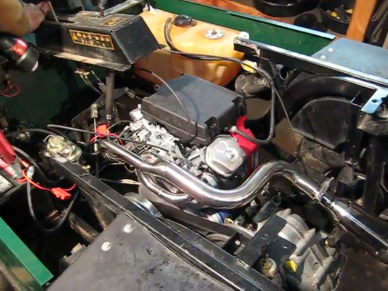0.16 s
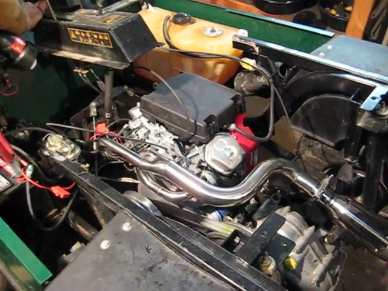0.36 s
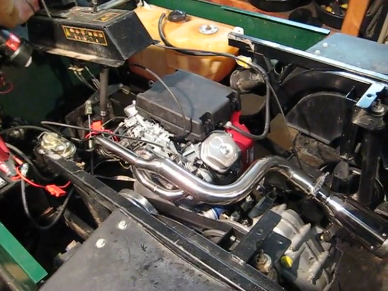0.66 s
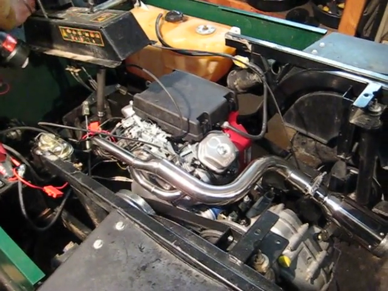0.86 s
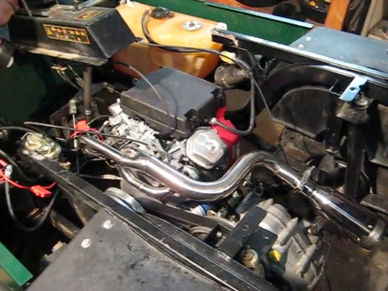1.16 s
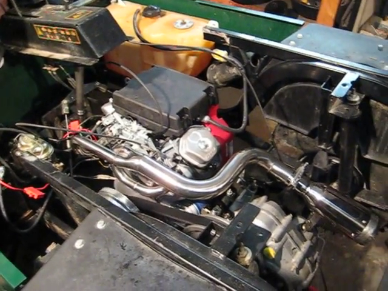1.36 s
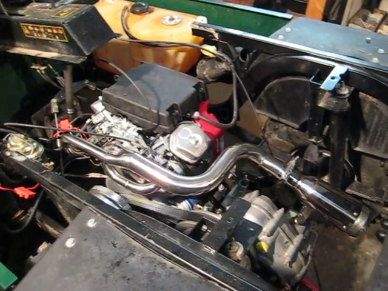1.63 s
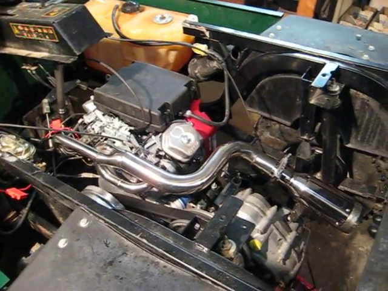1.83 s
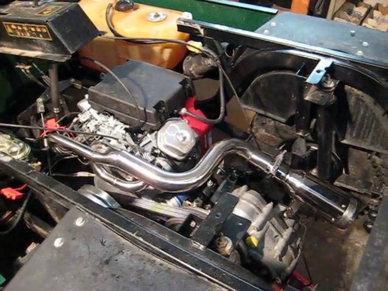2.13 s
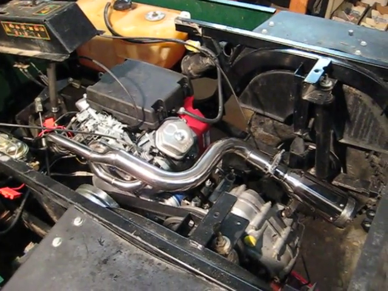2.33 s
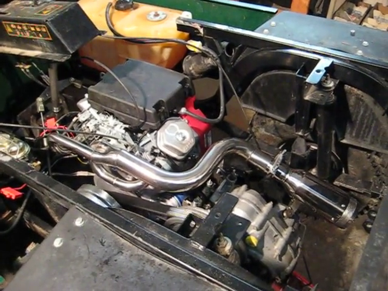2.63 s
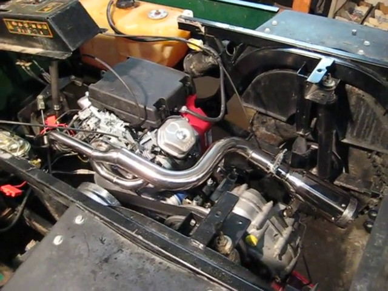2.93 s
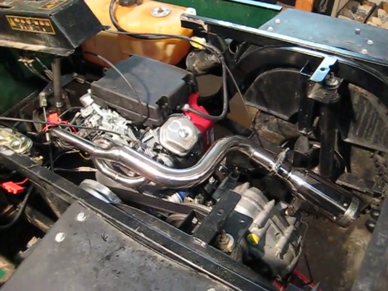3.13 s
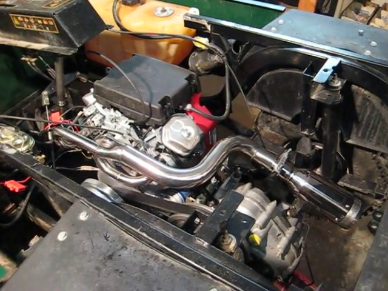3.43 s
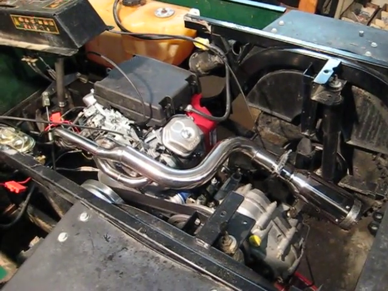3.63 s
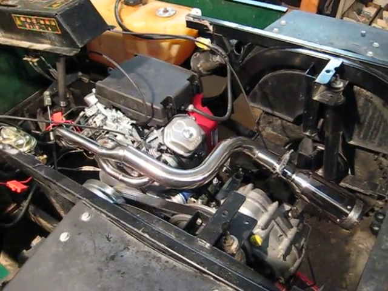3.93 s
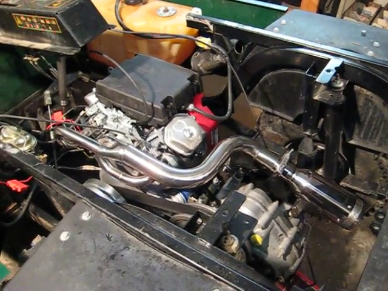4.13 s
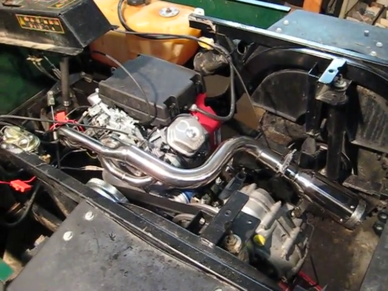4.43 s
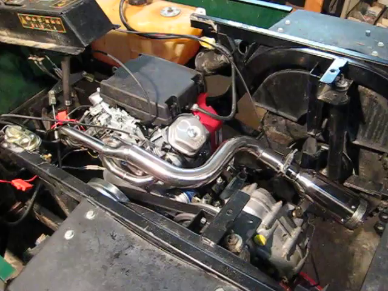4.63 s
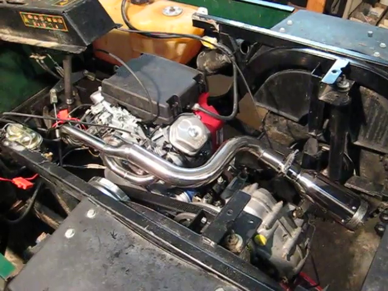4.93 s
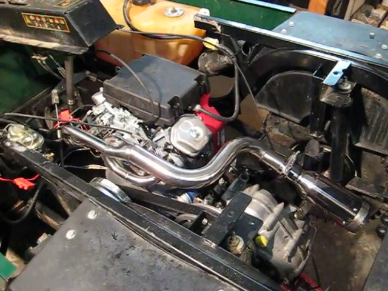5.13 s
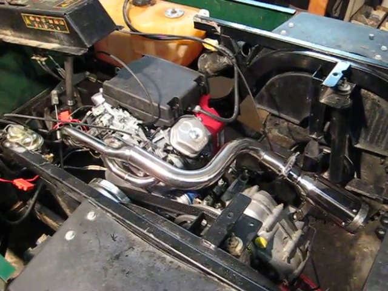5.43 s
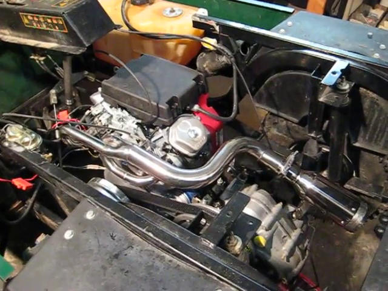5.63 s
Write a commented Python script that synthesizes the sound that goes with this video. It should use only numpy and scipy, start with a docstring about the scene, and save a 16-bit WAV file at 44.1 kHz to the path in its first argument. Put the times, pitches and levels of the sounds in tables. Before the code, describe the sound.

Close to an open engine bay outdoors, a hard metallic clack starts an electric starter. Its gears groan upward in fits within half a second, then grind and whine steadily with a fast compression throb, bright squeals and low exhaust puffs. At about four seconds drive stops; the engine shakes, knocks and rattles to rest. A faint squeak and a small click follow over quiet outdoor noise.

```python
"""A solenoid clacks, then a starter cranks a small V-twin petrol engine in an open engine bay, outdoors.
Pinion teeth strike the ring gear and ring the case; their pitch sags at each compression.
Gas pulses puff through the exhaust and excite its pipe resonance. The engine does not catch: filtered
noise bursts make it knock, rattle and settle to rest. A faint squeak of narrow-band noise and a second
clack follow, over a background of shaped outdoor noise and the sine hum of a distant machine."""
import sys
import numpy as np
from scipy import signal
from scipy.fft import rfft, irfft
from scipy.io import wavfile

SR = 44100
rng = np.random.default_rng(int(sys.argv[2]) if len(sys.argv) > 2 else 0)


def bounce(signal):
    """Save signal as a 16-bit WAV file at the path given by the first command-line argument."""
    frames = np.transpose(np.atleast_2d(signal))
    limited = np.clip(frames, -1, 1)
    pcm = np.round(limited * 32767).astype(np.int16)
    wavfile.write(sys.argv[1], SR, pcm)


N = 254365
TIME = np.arange(N) / SR  # s


# the starter runs from the beginning, its pinion bites fully, and later it is switched off
BITE_S, OFF_S = .097, 3.95
RUNUP_S = .15  # time constant of the fading run-up effort
COAST_S, COAST_POWER = .6, 1.5  # time to rest; friction brakes harder towards the end
COAST_DROP_DB = -10  # the teeth run unloaded once the starter is off
# mean crank speed: it picks up in fits, then holds: (time [s], speed [rpm])
CRANK_SPEED = [(0, 0), (.06, 160), (.095, 185), (.105, 339), (.133, 385), (.159, 388), (.177, 467),
               (.207, 502), (.279, 533), (.351, 588), (.373, 565), (.42, 604), (.457, 590), (.52, 624),
               (1, 646), (2.9, 637), (3.95, 640)]


def motion(bite_s=0.011, slip_db=-6):
    """Drive and friction set the crank speed (rpm), run-up effort (0-1) and gain of the tooth force."""
    bite = np.clip((TIME - BITE_S) / bite_s, 0, 1)
    coast = 1 - np.clip((TIME - OFF_S) / COAST_S, 0, 1) ** COAST_POWER
    rpm = np.interp(TIME, *np.transpose(CRANK_SPEED)) * coast
    effort = np.exp(-TIME / RUNUP_S) * bite
    powered = envelope(start_s=.05, attack_s=.015, hold_s=OFF_S - .065, fall_db_per_s=600)
    coasting = from_db(COAST_DROP_DB) * coast * (TIME > OFF_S)
    drive = from_db(slip_db * (1 - bite)) * np.maximum(powered, coasting)
    return rpm, effort, drive


RING_TEETH = 93.5  # tooth contacts per crank turn
TOOTH_SLOP = .025  # uneven tooth timing, share of a tooth
STEADY_S = .5  # when the rhythm is established
SETTLE_S = 0.55  # time constant of the early singing of the gears
GRIND_DB, SING_DB = -14.5, -20.5  # before effort, drive and case
CASE_SMEAR_T60_S = .06
# gear mesh tone: (multiple of the tooth rate, relative level [dB])
MESH_PARTIALS = [(1, -7), (2, -4), (3, -1.5), (4, 0), (5, 1.5), (6, 2), (7, 2.5), (8, 0), (9, -1), (10, 1),
                 (11, -1)]
# broad colour of starter and crankcase: (frequency [Hz], relative level [dB])
CASE_COLOUR = [(40, -18), (120, -14), (220, -14), (330, -8.5), (470, -30), (700, -8), (1050, -2),
               (1450, -1.5), (2400, -6.5), (3000, 0), (4500, -1), (7000, -10.5), (10500, -9.5),
               (15500, -31.5)]
# resonances of starter and crankcase: (frequency [Hz], width [Hz], lift [dB])
CASE_RESONANCES = [(1071, 16, 12.5), (1151, 31, 9.5), (1297, 83, 7), (1360, 45, -9), (1497, 93, 5),
                   (1700, 130, 5), (1872, 69, -7), (2012, 20, 6.5), (2646, 87, 6.5), (2830, 123, 9),
                   (3237, 150, 7), (3660, 60, 5), (3973, 140, 6.5), (4085, 38, 5), (4310, 84, 10),
                   (4710, 28, 13), (4762, 93, 6.5), (4830, 130, 2), (5516, 180, 10), (5890, 160, 13.5),
                   (6800, 140, 2), (7030, 330, 11.5), (7395, 65, 10), (8310, 200, 13), (8670, 170, 10.5),
                   (9430, 97, 6), (9560, 310, -3), (10520, 340, 2.5), (13340, 1700, 8.5)]


def starter(rpm, cycles, effort, drive, wander=.003, uneven_db=2.5, flicker_db=1.05, waver_db=3.5,
            scuff_db=-3, effort_db=2, early_sing_db=2, ring_db=-13):
    """Gear-mesh excitation: regular tooth impacts sing, uneven ones grind, and both ring the case."""
    swing, strain_db, load_db = compressions(cycles)
    early = np.exp(-TIME / SETTLE_S)
    steady = np.clip((TIME - STEADY_S) / .05, 0, 1)
    mesh_hz = rpm / 60 * RING_TEETH * (1 + swing * steady) * (1 + wander * drift(40))
    teeth = np.cumsum(mesh_hz) / SR + TOOTH_SLOP * drift(60)

    tone = np.zeros(N)
    for multiple, db in MESH_PARTIALS:
        phase = 2 * np.pi * (round(multiple) * teeth + rng.random())
        tone += from_db(db + waver_db * drift(47)) * np.sin(phase)
    tone = rms_one(smear(tone, CASE_SMEAR_T60_S)) * (TIME > BITE_S)
    singing = from_db(SING_DB + early_sing_db * early) * tone

    scuff = from_db(scuff_db) * rng.standard_normal(N)
    grind = rms_one(tooth_hits(teeth, uneven_db) + scuff)
    grinding = from_db(GRIND_DB + effort_db * effort + flicker_db * drift(27)) * grind
    force = drive * (grinding + singing + rockers(cycles))

    # slow teeth land softly and excite less treble
    soft = signal.sosfilt(signal.butter(1, 1500, fs=SR, output="sos"), force)
    hard = np.clip(rpm / 620, 0, 1) ** 2.0
    blows = hard * force + 2.0 * (1 - hard) * soft
    case = body(from_db(load_db) * blows, CASE_COLOUR, CASE_RESONANCES)

    tones = growl(teeth, strain_db * hard * steady) + whistle(teeth, mesh_hz, effort)
    tones = tones + hard * (squeal(cycles) + chirps(cycles))
    return reverberate(case, wet_db=ring_db, t60=0.21) + drive * tones


# two compressions of a four-stroke cycle: (position [share of cycle], width [share of cycle],
# loss of tooth rate [share], growl lift [dB], tooth load dip, negative for a rise [dB])
COMPRESSION_STROKES = [(1, .065, .08, 20.5, 0), (.41, .1, .07, 13, -0.5)]
# the tooth rate races between the compressions:
# (position [share of cycle], width [share of cycle], gain of tooth rate [share])
SPEED_SURGE = (.78, .085, .05)
# the gears run slightly out of true: (ripples [per cycle], depth [dB])
LOAD_RIPPLE = [(8, 0.4), (14, 0.66)]


def compressions(cycles):
    """Cyclic gas load modulates the tooth rate (share), growl (dB) and tooth load (dB)."""
    at, span, gain = SPEED_SURGE
    swing, strain_db, load_db = gain * once_a_cycle(cycles, at, span), 0, 0
    for share, width, loss, lift_db, dip_db in COMPRESSION_STROKES:
        squeeze = once_a_cycle(cycles, share, width)
        swing = swing - loss * squeeze
        strain_db = strain_db + lift_db * squeeze
        load_db = load_db - dip_db * squeeze
    for count, db in LOAD_RIPPLE:
        load_db = load_db + db * np.sin(2 * np.pi * round(count) * cycles)
    return swing - swing.mean(), strain_db, load_db


def tooth_hits(teeth, uneven_db):
    """Periodic impacts: each tooth's wear sets its timing, force and sign, repeating every cycle."""
    count = round(2 * RING_TEETH)
    wear = np.clip(rng.standard_normal((count, 3)), -2, 2)
    late, hard, side = wear[np.round(teeth).astype(int) % count].T
    return rms_one(passes(teeth + .15 * late) * from_db(uneven_db * hard) * np.sign(side))


# rockers take up their play: (position [share of cycle], level [dB])
ROCKER_CLICKS = [(0.255, -11), (0.551, -14), (.8, -10)]


def rockers(cycles, t60=0.13, clicks_per_s=2200, low_hz=6000):
    """Impact noise: each rocker sets off a short chatter of bright random clicks."""
    starts = sum(passes(cycles - share) * from_db(db) for share, db in ROCKER_CLICKS)
    clicks = rms_one((rng.random(N) < clicks_per_s / SR) * rng.choice([-1., 1.], N))
    bright = signal.sosfilt(signal.butter(2, low_hz, "high", fs=SR, output="sos"), clicks)
    return fade(starts, t60) * bright


GROWL_DB = -37  # before the strain lift
GROWL_SLOP = .03  # the teeth chatter under strain, share of a tooth
# the pinion groans in fits as it spins up:
# (start [s], length [s], level of mesh multiple 1 [dB], of 2 [dB], of 3 [dB])
PINION_GROANS = [(0.046, 0.047, -17.5, -22, -40), (0.104, 0.074, -19, -20, -19),
                 (0.172, 0.035, -22, -29, -23), (0.205, 0.05, -48, -19, -28), (0.296, 0.12, -28, -35, -37),
                 (0.352, 0.039, -20, -36, -26), (0.428, 0.033, -30, -28, -21)]


def growl(teeth, strain_db, second_db=-13):
    """Load modulation raises low mesh harmonics at each compression and in fits during the run-up."""
    chatter = teeth + GROWL_SLOP * drift(220)
    partials = []
    for k in range(1, 4):
        flutter = from_db(1.2 * drift(3) + drift(150))
        partials.append(np.sin(2 * np.pi * k * chatter) * flutter)
    out = from_db(GROWL_DB + strain_db) * (partials[0] + from_db(second_db) * partials[1])
    for s, length, *levels in PINION_GROANS:
        groan = sum(from_db(db) * p for db, p in zip(levels, partials))
        out = out + np.sqrt(np.abs(swell(s, length))) * groan
    return out


def whistle(teeth, mesh_hz, effort, level_db=-7, centre_hz=2740, width_hz=180):
    """Resonance crossing: in the run-up the third mesh multiple glides through a case mode."""
    level = from_db(level_db + 1.5 * drift(60)) * np.sqrt(effort)
    return level * near(3 * mesh_hz, centre_hz, width_hz) * np.sin(6 * np.pi * teeth)


SQUEAL_HZ, SQUEAL_REST_DB = 4073, -18.5
# bouts of squealing from the ring gear: (start [s], length [s], level [dB])
SQUEAL_BOUTS = [(0.844, 0.63, -8), (1.3, 0.38, -10.5), (1.658, 0.059, -15), (1.78, 0.17, -11),
                (2.325, 0.16, -14), (3.01, 0.064, -12), (3.2, 0.08, -13.5), (3.5, 0.13, -12),
                (3.754, 0.11, -12.5)]
# the squeal throbs three times a cycle: (position [share of cycle], width [share of cycle], level [dB])
SQUEAL_THROBS = [(.23, 0.12, 2), (.6, 0.105, 0), (.885, 0.11, 1.5)]


def squeal(cycles, phase_wander=0.5, waver_db=2.0):
    """Amplitude modulation: a ring-gear mode throbs at set points of the engine cycle."""
    level = from_db(SQUEAL_REST_DB)
    for s, length, db in SQUEAL_BOUTS:
        level = np.maximum(level, from_db(db) * np.sqrt(np.abs(swell(s, length))))
    excited = sum(from_db(db) * once_a_cycle(cycles, share, width, order=4)
                  for share, width, db in SQUEAL_THROBS)
    tone = np.sin(2 * np.pi * SQUEAL_HZ * TIME + phase_wander * drift(34))
    return level * excited * from_db(waver_db * drift(73)) * tone


# the starter housing sings briefly:
# (position [share of cycle], width [share of cycle], frequency [Hz], level [dB])
HOUSING_CHIRPS = [(1, 0.028, 2810, -22.5), (0.347, .04, 2890, -23), (0.14, .035, 5000, -24),
                  (0.434, 0.066, 4325, -18), (0.83, .06, 4900, -21.5), (0.0092, 0.028, 4200, -20),
                  (0.1, .03, 5500, -24), (0.385, .03, 4000, -22), (0.483, 0.032, 4745, -20),
                  (.08, 0.054, 5470, -33), (.22, 0.055, 6500, -29), (0.74, 0.057, 5890, -23),
                  (0.315, 0.045, 7080, -27), (0.86, 0.035, 6300, -20.5), (0.24, .05, 11000, -37),
                  (0.53, .05, 8660, -29), (0.83, 0.056, 9400, -29)]


def chirps(cycles, phase_wander=0.86, waver_db=5.0):
    """Modal excitation: modes of the housing sound at set points of the cycle, at wavering levels."""
    out = np.zeros(N)
    for share, width, hz, db in HOUSING_CHIRPS:
        level = from_db(db + waver_db * drift(40)) * once_a_cycle(cycles, share, width)
        out += level * np.sin(2 * np.pi * hz * TIME + phase_wander * drift(50))
    return out * (1 - np.exp(-TIME / SETTLE_S))


PIPE_HZ, PIPE_T60_S = 69.2, 0.25  # lowest resonance of the pipe
# gas pulses at the valves: (position [share of cycle], boom level [dB], rasp level [dB])
GAS_PULSES = [(.09, -26, -10), (.2, -8, -10), (.277, -6, -3.5), (.573, -.5, -12), (.727, -7.5, -17),
              (.8, -26, -9), (.885, -12, -6.5)]
# colour of the puffs: (frequency [Hz], relative level [dB])
RASP_COLOUR = [(70, -40), (150, 2.5), (240, 10), (340, -1.5), (500, -27), (1500, 0.5), (8000, -46)]
# last heaves of the engine: (time [s], level [dB])
LAST_HEAVES = [(3.977, -31), (4.025, -20), (4.072, -24), (4.103, -25), (4.183, -30), (4.231, -33),
               (4.345, -27.5), (4.424, -33.5)]


def exhaust(cycles, boom_db=-25.0, rasp_db=-29, puff_t60=0.026, thud_db=0):
    """Pipe resonance: each gas pulse thuds and puffs into the pipe, which booms at its lowest mode."""
    cranking = (TIME > .19) & (TIME < 4.05)
    booms = sum(passes(cycles - share) * from_db(db) for share, db, _ in GAS_PULSES) * cranking
    rasps = sum(passes(cycles - share) * from_db(db) for share, _, db in GAS_PULSES) * cranking
    heaves = np.zeros(N)
    for s, db in LAST_HEAVES:
        add(heaves, s, from_db([db]))
    boom = from_db(boom_db) * ring(booms, PIPE_HZ, PIPE_T60_S) + ring(heaves, 64.0, 0.38)
    boom = signal.sosfilt(signal.butter(4, 38, "high", fs=SR, output="sos"), boom)
    hiss = fade(rasps, puff_t60) * rng.standard_normal(N)
    puffs = from_db(thud_db) * rasps + from_db(rasp_db) * hiss
    return boom + body(puffs, RASP_COLOUR)


KNOCK_RISE_S = .002
# colour of struck and rattling parts: (frequency [Hz], relative level [dB])
RATTLE_COLOUR = [(210, -38), (350, -10), (438, -11.5), (791, -1), (857, -2), (1110, -4), (1450, -2),
                 (1850, -7.5), (3180, -7), (5140, -11.5), (6130, -12.5), (7790, -16.5), (13200, -22),
                 (16000, -37)]
# loose brackets and covers: (frequency [Hz], width [Hz], lift [dB])
LOOSE_PART_MODES = [(846, 17, 10.5), (1027, 36, 6), (1192, 34, 8.5), (1435, 36, 7), (2150, 36, 7),
                    (2480, 30, 9.5), (2870, 32, 10), (3108, 44, 2), (3230, 38, 4), (3910, 74, 8),
                    (5470, 170, 1)]
# backlash knocks: (time [s], level [dB], treble tilt [dB per octave], t60 [s],
# pitch of the struck part [Hz], its lift [dB], thump of the block [dB])
BACKLASH_KNOCKS = [(3.971, -9, -1, 0.12, 1050, 6, -11), (4.046, -11, -1, 0.18, 2280, 7, -8),
                   (4.091, -10.5, -2, 0.12, 890, -6, 0), (4.112, -12, -5, 0.17, 1380, -2, -5),
                   (4.138, -8, -0.5, 0.1, 3580, 8, -8), (4.164, -11.5, -5.5, 0.15, 3250, 16.5, -8),
                   (4.211, -8.5, 0.5, 0.095, 900, -2, -14), (4.218, -4, 0, 0.073, 1500, 5, -20),
                   (4.246, -5.5, 2, 0.092, 3340, 10.5, -9.5), (4.276, -10, -4, 0.14, 2800, 8, -16),
                   (4.321, -8, -6, 0.087, 2100, 14, -14), (4.331, -13.5, -7, 0.073, 720, 11, -11),
                   (4.411, -8.5, -8.5, 0.089, 1210, 5, -18), (4.457, -17.5, -10, 0.16, 1200, 3, -7),
                   (4.496, -19, -1, 0.14, 3280, 6, -12), (4.581, -21, -15, 0.099, 900, -7, -10),
                   (4.671, -17, -2, 0.097, 970, 1, -9), (4.695, -19.5, -4, 0.076, 1210, 8, -7),
                   (5.02, -32.5, -1, 0.33, 1200, 4, -8)]
# the block under a knock: (frequency [Hz], relative level [dB])
THUMP_COLOUR = [(60, -12), (150, -8), (260, 4), (450, -17), (700, -18), (1500, -33), (6000, -60)]
# thin bright ticks while it slows: (time [s], level [dB])
BRIGHT_TICKS = [(3.999, -24), (4.063, -19), (4.111, -22), (4.349, -22.5), (4.424, -26), (4.833, -39)]
# colour of the ticks: (frequency [Hz], relative level [dB])
BRIGHT_TICK_COLOUR = [(1000, -39), (6000, -4), (8300, -4), (10500, -6), (13000, -2), (16000, -17)]


def knocks(crack_db=-5, crack_t60=0.014, tick_t60=0.14):
    """Backlash impacts: a crack, a ringing part and a thumping block, with thin ticks among them."""
    out = np.zeros(N)
    for s, db, tilt, t60, hz, lift_db, thump_db in BACKLASH_KNOCKS:
        crack = from_db(crack_db) * burst(crack_t60, rise=0.00018)
        blow = burst(t60, rise=KNOCK_RISE_S) + crack
        modes = LOOSE_PART_MODES + [(hz, hz / 6, lift_db)]
        part = body(blow, RATTLE_COLOUR, modes, tilt_db=tilt)
        thump = from_db(thump_db) * body(burst(0.069, rise=0.0036), THUMP_COLOUR)
        add(out, s, from_db(db) * (part + thump))
    for s, db in BRIGHT_TICKS:
        add(out, s, from_db(db) * body(burst(tick_t60, rise=0.0015), BRIGHT_TICK_COLOUR))
    return out


# the engine shaking on its mounts: (frequency [Hz], relative level [dB])
RUMBLE_COLOUR = [(30, -54), (70, -2), (120, -9), (190, -1), (270, -6), (400, -9), (700, -42), (3000, -45)]


def rundown(rumble_db=-23, rattle_db=-20, settle_db=-34, rough_db=-1.5, ticks_per_s=400, tick_db=-7):
    """Decaying vibration: without drive the engine shakes on its mounts; loose parts tick and settle."""
    shaking = from_db(rumble_db) * envelope(OFF_S, attack_s=0.12, hold_s=0.092, fall_db_per_s=35.5)
    rattling = from_db(rattle_db) * envelope(OFF_S, attack_s=0.014, hold_s=0.36, fall_db_per_s=53)
    settling = from_db(settle_db) * envelope(OFF_S, attack_s=0.57, hold_s=0.16, fall_db_per_s=31.0)
    rumble = body(rng.standard_normal(N), RUMBLE_COLOUR, [(276.7, 15.0, 14.7)])
    scrape = rms_one(rng.standard_normal(N) * from_db(rough_db * drift(100)))
    ticks = rms_one((rng.random(N) < ticks_per_s / SR) * rng.standard_normal(N))
    ticks = rms_one(signal.fftconvolve(ticks, burst(0.019, rise=0.00025))[:N])
    rattle = body(scrape + from_db(tick_db) * ticks, RATTLE_COLOUR, LOOSE_PART_MODES)
    return shaking * rumble + np.hypot(rattling, settling) * rattle


TOUCH_DB, BOUNCE_S = -9.5, 0.011  # level of the first touch; time between bounces
# the solenoid slams in and drops out: (time [s], level [dB], lead of the first touch [s],
# loss per bounce [dB], treble tilt [dB per octave])
SOLENOID_CLACKS = [(0.0366, 1.5, 0.0087, 4.5, -1.5), (5.7302, -11.5, 0.0051, 6.5, 2.5)]
# colour of the clack: (frequency [Hz], relative level [dB])
SOLENOID_COLOUR = [(100, -52), (300, -20), (700, 1), (1100, 1), (1600, -5), (2300, 1), (3300, 11),
                   (4500, 2), (6200, -2), (8000, -2), (11000, -8), (15500, -17)]
# resonances of the starter body: (frequency [Hz], width [Hz], lift [dB])
SOLENOID_MODES = [(1620, 300, 14.5), (2820, 140, -1), (4030, 43, -9), (4620, 19, 10.5), (6350, 540, 6)]


def solenoid(crack_t60=0.031, ring_t60=0.26, ring_db=-14, bounce_count=3):
    """Repeated impact: steel touches, slams and bounces; each contact cracks and rings the body."""
    out = np.zeros(N)
    for s, db, lead, loss_db, tilt in SOLENOID_CLACKS:
        contacts = [(s - lead, db + TOUCH_DB)]
        contacts += [(s + k * BOUNCE_S, db - k * loss_db) for k in range(bounce_count + 1)]
        for at, level_db in contacts:
            crack = 1.3 * burst(crack_t60, rise=0.0011)
            blow = crack + from_db(ring_db) * burst(ring_t60, rise=0.018)
            clack = body(blow, SOLENOID_COLOUR, SOLENOID_MODES, tilt_db=tilt)
            add(out, at, from_db(level_db) * clack)
    return out


SQUEAK_S, SQUEAK_LENGTH_S = 4.73, .11


def squeak(level_db=-37.5, centre_hz=3650, width_hz=350):
    """Noise-driven resonance: a faint dry squeak as the moving parts settle."""
    t60 = np.log(1000) / (np.pi * width_hz)
    rub = ring(rng.standard_normal(N), centre_hz, t60)
    return from_db(level_db) * swell(SQUEAK_S, SQUEAK_LENGTH_S) * rms_one(rub)


YARD_DB = -35.5
# colour of the outdoor noise: (frequency [Hz], relative level [dB])
YARD_COLOUR = [(25, -25), (55, -4.5), (100, -7.5), (125, 5), (155, 1.5), (220, -1), (300, -2), (390, -1.5),
               (470, -1), (650, 5), (900, -1.5), (1400, -3), (2100, -1.5), (3500, -7.5), (6000, -15.5),
               (10000, -22), (13000, -25), (16000, -32)]
# distant machine: (frequency [Hz], RMS level before wavering [dB])
DISTANT_HUM = [(377, -52), (598, -51), (840, -44.5), (990, -50.5)]


def yard(waver_db=1.5, phase_wander=0.12, flicker_db=0.6):
    """Ambient background: fluttering broadband noise plus the wavering tones of a distant machine."""
    hum = np.zeros(N)
    for hz, db in DISTANT_HUM:
        level = from_db(db + waver_db * drift(2.8))
        hum += level * np.sin(2 * np.pi * hz * TIME + phase_wander * drift(1.4))
    noise = body(rng.standard_normal(N), YARD_COLOUR)
    return np.sqrt(2) * hum + from_db(YARD_DB + flicker_db * drift(23)) * noise


def from_db(db):
    """Decibel law: level to amplitude ratio."""
    return 10 ** (np.asarray(db) / 20)


def rms_one(x):
    """Power normalisation to an RMS of 1."""
    return x / np.sqrt(np.mean(x ** 2) + 1e-20)


def drift(rate):
    """Low-passed noise: smooth chance of RMS 1 that changes about rate times a second."""
    r = np.exp(-80 * np.pi * rate / SR)  # runs at SR / 40
    noise = rng.standard_normal(N // 40 + 2002)
    slow = signal.lfilter([1], [1, -2 * r, r * r], noise)[2000:]
    return np.interp(np.arange(N) / 40, np.arange(len(slow)), rms_one(slow))


def body(x, colour, modes=(), tilt_db=0, size=8192):
    """Minimum-phase filter of unit energy: a broad colour, resonances and a tilt above 1 kHz."""
    hz = np.maximum(np.arange(size // 2 + 1) * SR / size, 1)
    at, level = np.transpose(colour)
    db = np.interp(np.log(hz), np.log(at), level) + tilt_db * np.log2(np.maximum(hz / 1000, 1))
    for centre, width, lift in modes:
        db = db + lift / (1 + (2 * (hz - centre) / width) ** 2)
    # folding the cepstrum makes the response causal
    cepstrum = irfft(np.log(from_db(db)))[:size // 2]
    cepstrum[1:] *= 2
    response = irfft(np.exp(rfft(cepstrum, size)))
    return signal.fftconvolve(x, response / np.linalg.norm(response))[:len(x)]


def ring(clicks, hz, t60):
    """Damped resonator: a unit click sets a decaying sine of starting height 1 ringing."""
    r, w = from_db(-60 / (t60 * SR)), 2 * np.pi * hz / SR
    return signal.lfilter([0, np.sin(w)], [1, -2 * r * np.cos(w), r * r], clicks + 1e-18)


def fade(clicks, t60):
    """Exponential decay: each click starts a dying envelope."""
    return signal.lfilter([1], [1, -from_db(-60 / (t60 * SR))], clicks + 1e-18)


def passes(turns):
    """Phase triggering: a unit click whenever a count of turns passes a whole number."""
    return np.diff(np.floor(turns), prepend=np.floor(turns[0]))


def once_a_cycle(cycles, share, width, order=2):
    """Periodic window: a bell of height 1 at one point of the cycle; higher orders are flatter on top."""
    return np.exp(-(((cycles - share + .5) % 1 - .5) / width) ** order)


def burst(t60, rise, size=16384):
    """Transient noise that swells with time constant rise (s) and dies away."""
    t = np.arange(size) / SR
    return rng.standard_normal(size) * (1 - np.exp(-t / rise)) * from_db(-60 * t / t60)


def add(out, s, sound):
    """Superposition: mix a sound in at time s."""
    start = int(np.clip(s * SR, 0, N - 1))
    out[start:start + len(sound)] += sound[:N - start]


def envelope(start_s, attack_s, hold_s, fall_db_per_s):
    """Attack and decay: a straight rise, a hold and a steady fall in dB."""
    t = TIME - start_s
    return np.clip(t / attack_s, 0, 1) * from_db(-fall_db_per_s * np.maximum(t - attack_s - hold_s, 0))


def swell(start_s, length_s):
    """Half-sine window: a smooth arch from silence to 1 and back."""
    return np.sin(np.pi * np.clip((TIME - start_s) / length_s, 0, 1))


def near(hz, centre_hz, width_hz):
    """Resonance curve: how strongly a gliding tone excites a mode, 0-1."""
    return 1 / (1 + ((hz - centre_hz) / width_hz) ** 4)


def smear(x, t60):
    """All-pass dispersion: the casting delays each frequency differently, with little colouring."""
    paths = rfft(np.roll(burst(t60, rise=.001), 512))
    response = irfft(paths / np.abs(paths))[:8192]
    return signal.fftconvolve(x, response)[512:512 + N]


def reverberate(x, wet_db, t60):
    """Diffuse reflection: dense short echoes inside a casting or between panels of the engine bay."""
    echoes = burst(t60, rise=0.0044)
    return x + from_db(wet_db) * signal.fftconvolve(x, echoes / np.linalg.norm(echoes))[:N]


COMPRESSION_S = 2.07  # a compression that fixes the phase of the cycle


def scene():
    """Phase locking: the crank's mean speed times both the gear whine and the exhaust."""
    rpm, effort, drive = motion()
    cycles = np.cumsum(rpm / 120) / SR  # two crank turns a cycle
    cycles = cycles - np.interp(COMPRESSION_S, TIME, cycles)
    engine = starter(rpm, cycles, effort, drive) + exhaust(cycles) + knocks() + rundown()
    return (engine + solenoid() + squeak() + yard())[None]


def gain_control(x, threshold_db=-21, share=0.9, release_db_per_s=12, window_s=0.056):
    """Dynamic compression: a rising smoothed level cuts the gain, which then creeps back up."""
    r = np.exp(-1 / (window_s * SR))
    level_db = 10 * np.log10(signal.lfilter([1 - r], [1, -r], x ** 2) + 1e-12)
    cut_db = share * np.maximum(level_db - threshold_db, 0)
    release_db = release_db_per_s * TIME
    held_db = np.maximum.accumulate(cut_db + release_db, axis=-1) - release_db
    return x * from_db(-held_db)


CUTOFF_HZ = 15800


def record(dry, top=0.72):
    """Compression evens the level, saturation rounds the loudest peaks and a low-pass cuts the top."""
    even = gain_control(dry)
    limited = even / (1 + (even / top) ** 4) ** (1 / 4)
    return signal.sosfilt(signal.ellip(10, .2, 80, CUTOFF_HZ, fs=SR, output="sos"), limited)


dry = scene()
out = record(dry)
bounce(out)
```